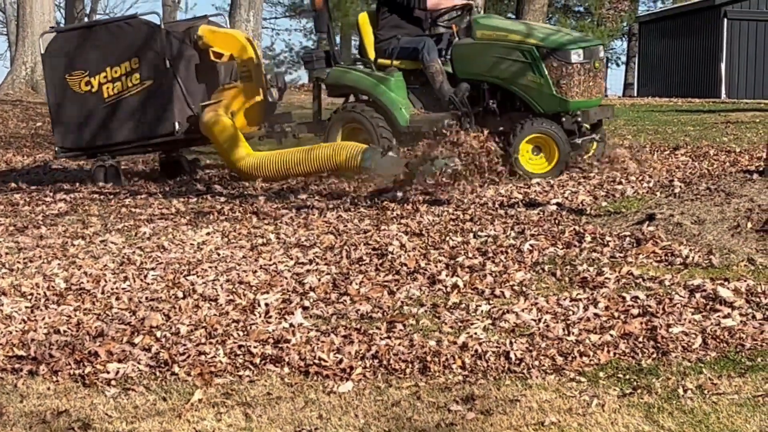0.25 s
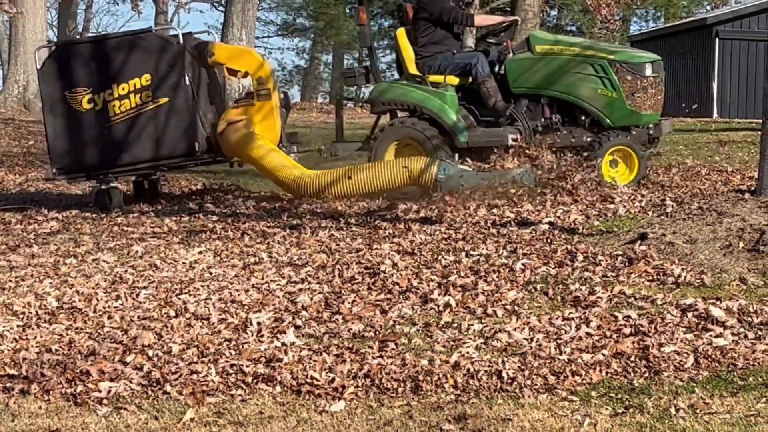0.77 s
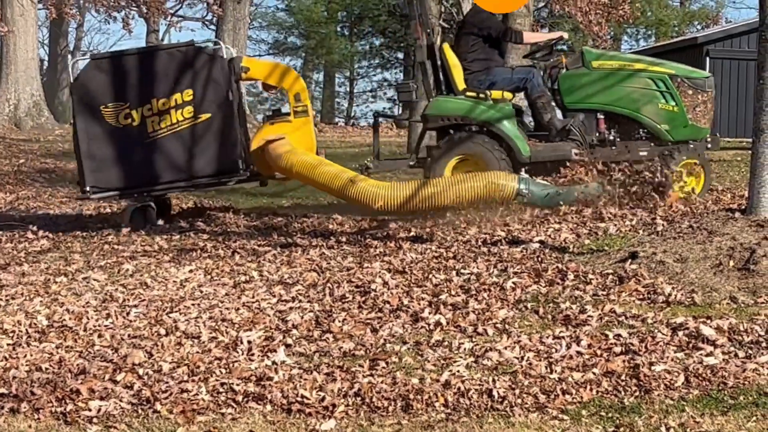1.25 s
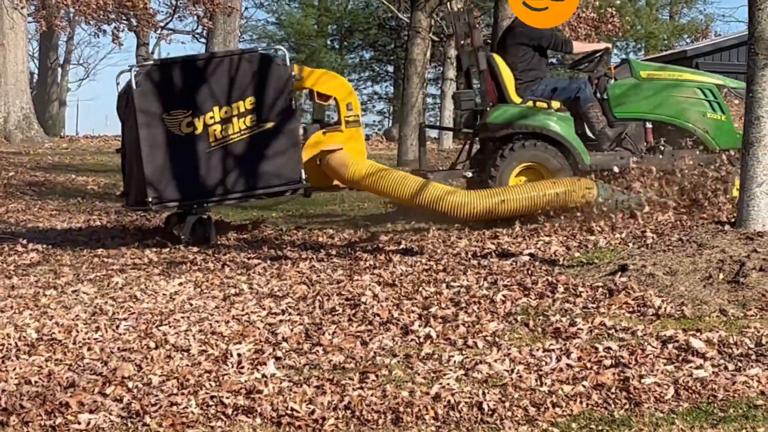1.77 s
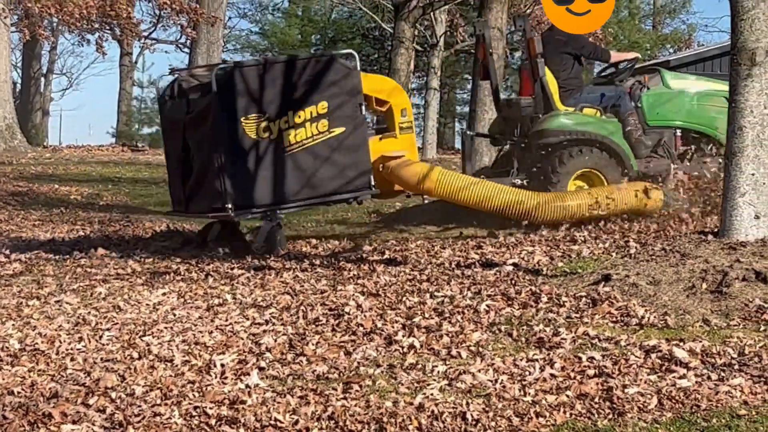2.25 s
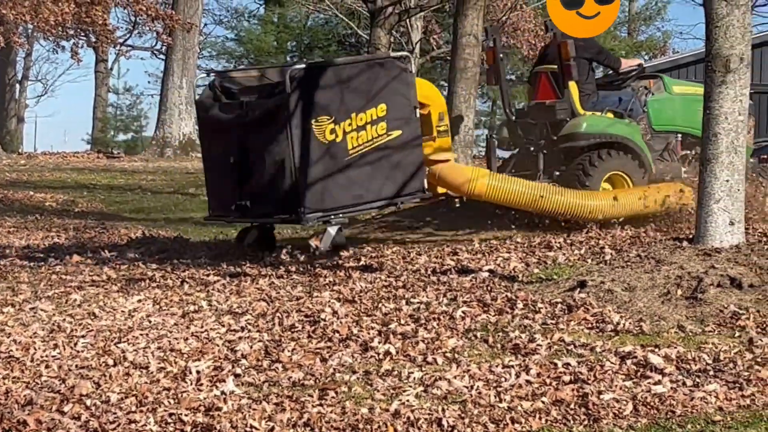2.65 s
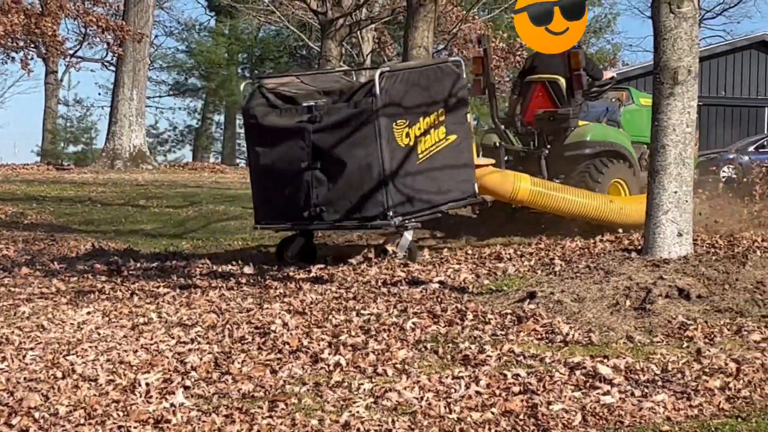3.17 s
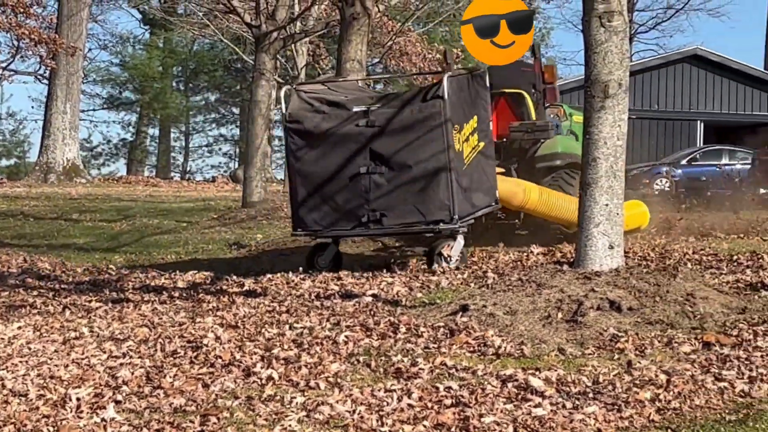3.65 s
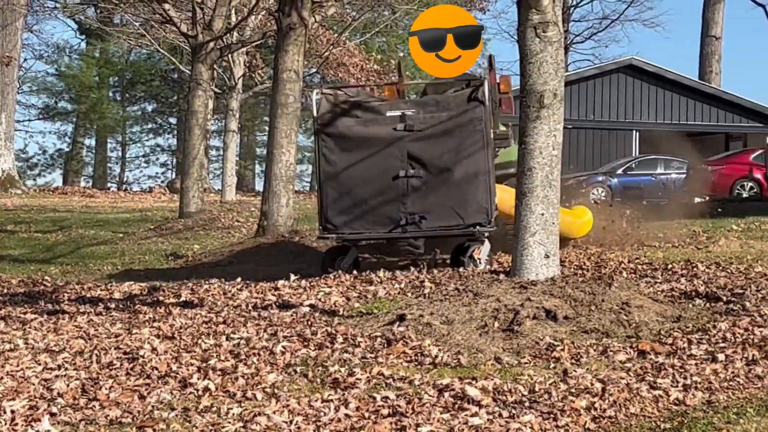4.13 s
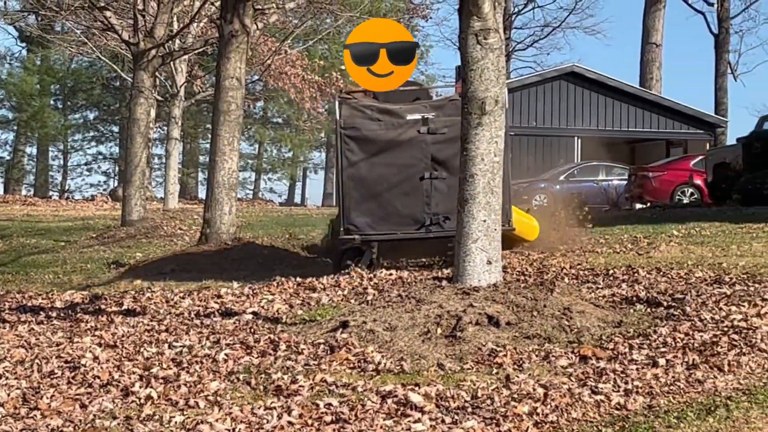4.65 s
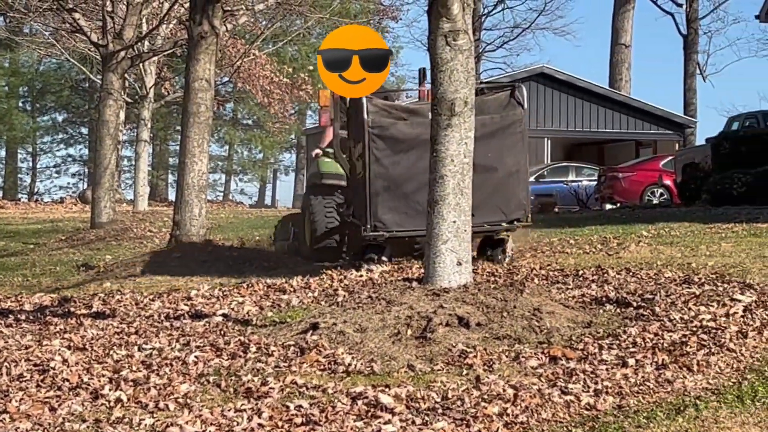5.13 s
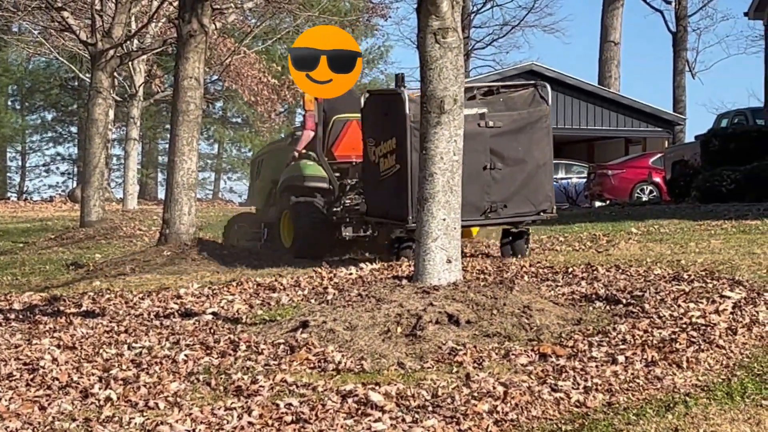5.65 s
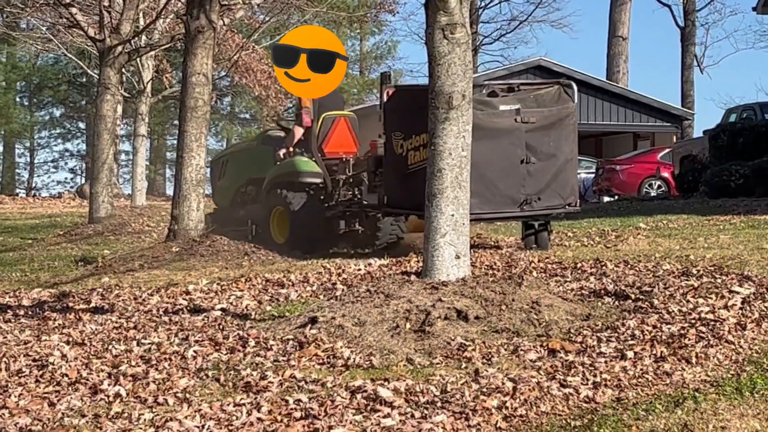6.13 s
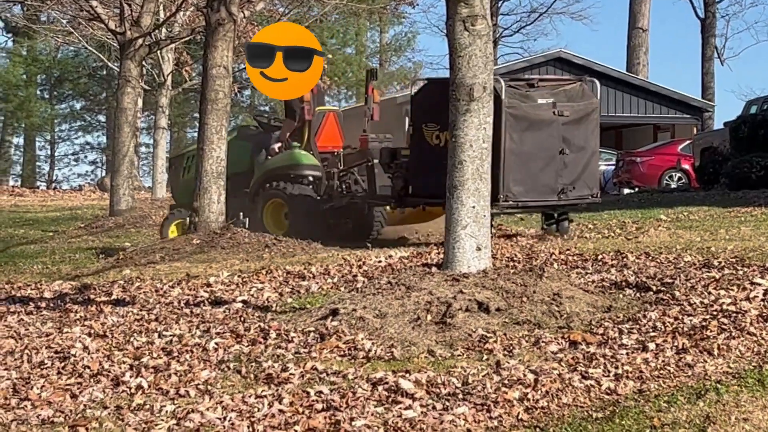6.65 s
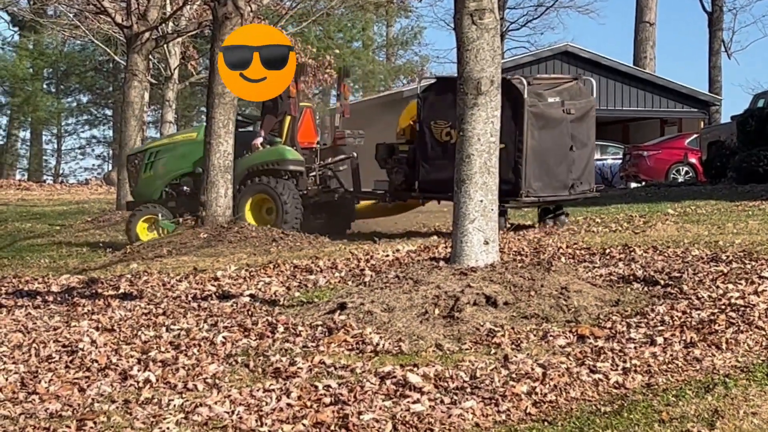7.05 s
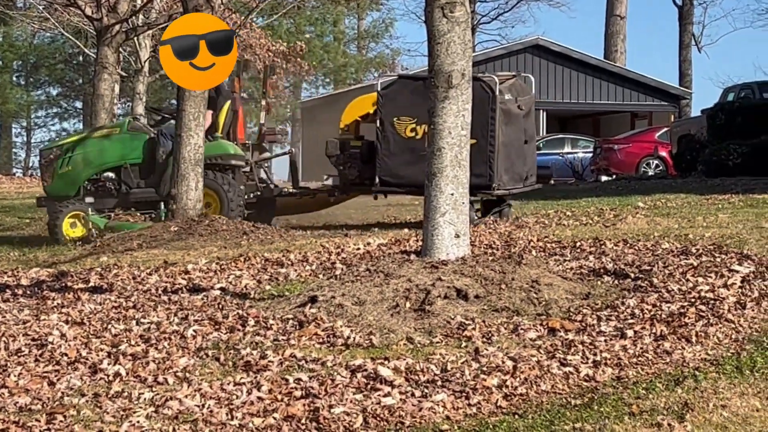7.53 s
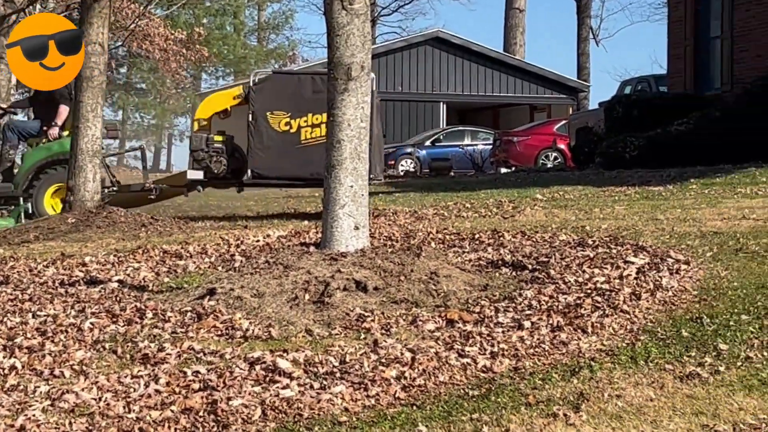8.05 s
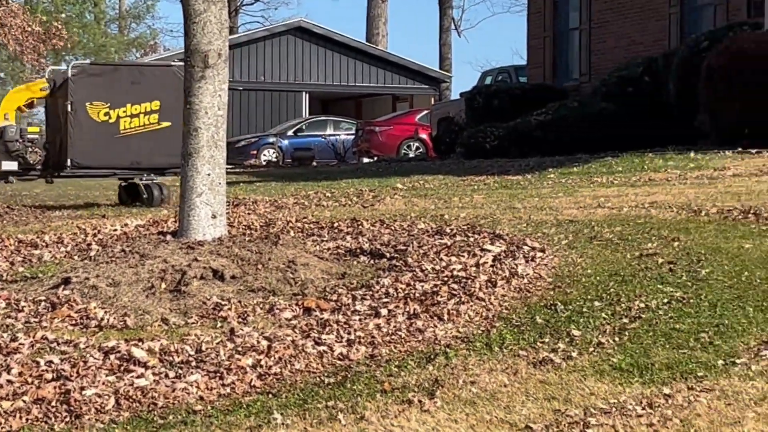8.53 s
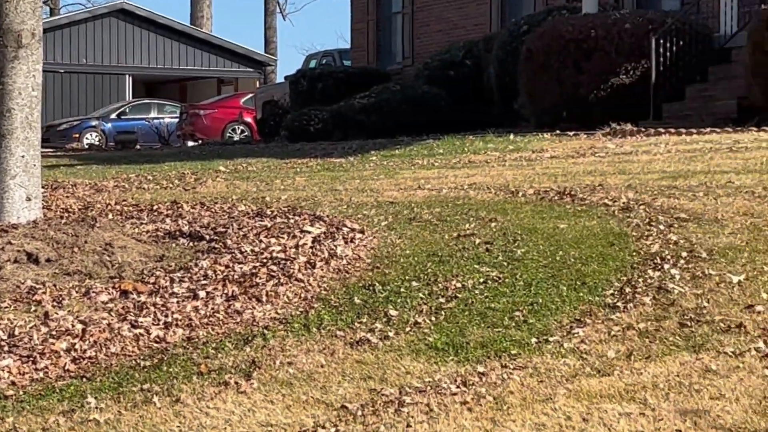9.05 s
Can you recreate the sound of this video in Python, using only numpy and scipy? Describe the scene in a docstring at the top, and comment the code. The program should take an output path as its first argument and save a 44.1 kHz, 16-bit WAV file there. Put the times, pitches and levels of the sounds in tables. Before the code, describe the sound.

A diesel lawn tractor tows a leaf vacuum, engines droning and clattering over a rush of air and crackling dry leaves.

```python
"""Lawn tractor towing a leaf vacuum

A diesel tractor with a mower deck pulls a petrol-engined leaf vacuum round some trees, drawing away
and turning its sides to a stereo microphone. Blades, two exhausts and a pump hum over the clatter of
the diesel. Air rushes under the deck and up the hose, carrying dry leaves, dust and sticks.
Gusts buffet the microphone ports."""
import sys
import numpy as np
from scipy import signal
from scipy.fft import rfft, irfft, next_fast_len
from scipy.io import wavfile
from scipy.ndimage import uniform_filter1d, map_coordinates

SR = 44100
rng = np.random.default_rng(int(sys.argv[2]) if len(sys.argv) > 2 else 0)


def generate_wav(sig):
    """Save sig (samples, or channels by samples) to the path in sys.argv[1] as 16-bit PCM at SR."""
    pcm = np.round(np.clip(np.atleast_2d(sig).T, -1, 1) * 32767).astype(np.int16)
    wavfile.write(sys.argv[1], SR, pcm)


N = 409688

# Blade passing rate, belted to the diesel: t/s, f/Hz
BLADE_RATE = [(0, 106.3), (1.2, 106.4), (2.7, 105.9), (4, 106.1), (5.8, 106.3), (7, 106.6), (8.3, 107.2),
              (9.29, 107.4)]


def blades():
    """Each blade tip thumps the air under the deck; the tones beat slowly and swell by turns."""
    low_levels = [(0, -18.5, -27, -53, -33), (.2, -19.5, -26, -39.5, -34), (.4, -23, -27.5, -40, -39.5),
                  (.8, -37, -34, -36, -42.5), (1.1, -27.5, -35, -31.5, -40.5),
                  (1.5, -24.5, -27.5, -36.5, -37.5), (1.9, -20.5, -23.5, -40, -41),
                  (2.4, -17.5, -27, -42, -44.5), (2.62, -18, -37, -41, -36.5), (2.9, -17, -40, -37.5, -45),
                  (3.15, -18.5, -34.5, -37.5, -46), (3.4, -22, -35.5, -49, -58),
                  (3.65, -21, -25.5, -52, -43), (3.88, -30, -33, -47, -50), (4, -29.5, -25.5, -34, -58),
                  (4.25, -24.5, -27.5, -36.5, -57), (4.6, -21.5, -32, -34, -56),
                  (5.2, -17.5, -30.5, -43, -42), (5.65, -15.5, -33, -39.5, -55),
                  (5.95, -15.5, -37, -50, -50), (6.45, -15, -31.5, -44, -49.5),
                  (6.9, -21.5, -34.5, -44, -40), (7.3, -30, -36.5, -44, -44),
                  (7.8, -33.5, -34.5, -38, -42.5), (8.15, -25, -31.5, -35, -41.5),
                  (8.35, -27, -32.5, -34.5, -39), (8.6, -30, -37.5, -36.5, -46),
                  (8.9, -31, -33.5, -38, -44), (9.29, -27, -36, -47, -42)]  # t/s, level/dB of harmonics 1, 2, 3, 4
    fifth_level = [(0, -53), (.8, -58), (1.3, -47), (1.65, -39), (2, -45), (2.3, -55), (6.8, -56),
                   (7.5, -45), (7.9, -56), (8.25, -47), (8.7, -54), (9.29, -49)]  # harmonic 5: t/s, level/dB
    top_swells = {6: [(.1, .3, -47), (1.7, 0.32, -46.5), (2.6, .2, -52), (4, .3, -54), (4.68, .12, -46),
                  (5.1, .08, -44), (6.2, .2, -54), (8.3, .5, -52)], 7: [(4.55, 0.13, -49)],
                  8: [(1.6, .5, -47), (4.9, 0.51, -47), (6.15, 0.093, -50)], 9: [(1.2, .6, -48),
                  (5.1, .2, -47), (7.4, 0.087, -47)], 10: [(.8, .6, -54), (5.8, .15, -47), (6.4, .25, -51),
                  (7.1, .15, -46.5)]}  # by harmonic number: t/s, spread/s, level/dB
    phase = turns(curves(BLADE_RATE)[0])
    low = sum(tone(k * phase, db, 0.75, 0.12) for k, db in enumerate(curves(low_levels), 1))
    low += tone(5 * phase, curves(fifth_level)[0], 1.1, .2)
    top = sum(tone(k * phase, swells(rows, rest_db=-59.5), 1.6, .3) for k, rows in top_swells.items())
    return low + top


def diesel():
    """Exhaust of three slightly unequal cylinders; returns the sound and the firing phase."""
    firing_level = [(0, -21.5), (1.5, -21), (2.1, -23.5), (2.7, -30), (3.4, -26), (4.1, -26.5),
                    (4.7, -23.5), (5.9, -28), (6.4, -25.5), (7.5, -34), (8.1, -30), (9.29, -27.5)]  # firing tone: t/s, level/dB
    orders = [(2, -12), (5, -9.5), (7, -8), (9, -16.5), (12, -17), (13, -17), (14, -11), (15, -12.5)]  # multiple of the three-firing cycle, level/dB re second harmonic
    passes_per_firing = 1.351
    second_db = -35.5 + 2.7 * wobble(2.478)
    phase = turns(curves(BLADE_RATE)[0] / passes_per_firing)
    exhaust = tone(phase, curves(firing_level)[0], 0.41, 0.052) + tone(2 * phase, second_db, 1.6, 0.23)
    exhaust += sum(tone(k * phase / 3, second_db + db, 2.5, .3) for k, db in orders)
    return exhaust, phase


def clatter(phase):
    """Firings knock six resonances, loudest as the engine side faces the microphone."""
    # Modes of each part: f/Hz, width/Hz, level/dB
    cover = [(2834, 47, 5), (2420, 58, -8.5)]
    block = [(3390, 100, 3), (3670, 92, 1), (4250, 85, -11)]
    rattle = [(6990, 150, 16), (6430, 150, -18)]
    hood = [(1950, 51, -2), (2090, 47, -2)]
    tappet = [(3750, 100, 3), (3840, 85, -4)]
    drone = [(1760, 31, 13), (1700, 30, 3), (1420, 46, -12)]
    parts = cover, block, rattle, hood, tappet, drone
    part_swells = ([(.4, 0.36, -39), (2.6, .1, -45), (5.95, 0.03, -40), (6.65, .15, -49),
                   (7.15, 0.32, -41.5), (8.1, .5, -48)], [(.4, .4, -45), (2.6, .1, -51), (7.66, .12, -40),
                   (7.92, .12, -44), (8.18, 0.13, -35), (8.45, 0.13, -37), (8.7, 0.054, -36),
                   (9.05, 0.054, -37), (9.22, .05, -39)], [(3.76, 0.075, -41), (6.2, 0.32, -42),
                   (7.6, .2, -48), (8.05, 0.16, -42), (9.05, 0.18, -55)], [(.45, .2, -40), (2.5, .2, -55),
                   (8.5, 0.12, -37), (8.75, 0.13, -39.5), (8.95, .1, -37), (9.13, .05, -37),
                   (9.25, .1, -36)], [(6.1, .35, -47), (7.68, 0.07, -42), (7.9, .15, -39.5),
                   (8.6, .08, -39), (8.85, 0.13, -38), (9.07, .1, -42), (9.25, 0.064, -39)],
                   [(.15, 0.29, -48), (2.7, 0.33, -39), (6, .6, -53), (8.66, .1, -37), (8.85, .12, -42),
                   (9.03, .08, -42), (9.2, 0.092, -36)])  # per part: t/s, spread/s, relative level/dB
    rest_levels = (-50, -56, -52.5, -54, -60, -48.5)  # per part, between swells: relative level/dB
    unevenness = (.19, 0.15, 0.34, .19, 0.53, 0.6)  # per part: how much harder one cylinder knocks
    fired = np.diff(np.floor(phase / (2 * np.pi) + .008 * wobble(40)), prepend=0) > 0
    out = 0
    for modes, rows, rest_db, uneven in zip(parts, part_swells, rest_levels, unevenness):
        gate = np.exp(0.76 * np.cos(phase) + uneven * np.cos(phase / 3)) * amp(2.1 * wobble(30))
        blows = unit(fired * gate * amp(1.5 * rng.standard_normal(N)))
        bursts = unit(gate * rng.standard_normal((2, N)))
        knocks = bursts + 1.6 * np.array([blows, np.roll(blows, 150)])  # direct, scattered
        level_db = swells(rows, rest_db) - 4.5 + 0.66 * wobble(6.5)
        out += amp(level_db) * resonate(knocks, modes)
    return out


def resonate(knocks, modes, soft_hz=7500):
    """Knocks ring a part's modes, softened above soft_hz; rms 1."""
    def response(hz):
        ring = sum(amp(db) * 1j * hz * width / (centre ** 2 - hz ** 2 + 1j * hz * width)
                   for centre, width, db in modes)
        return ring / (1 + 1j * hz / soft_hz) ** 4
    return unit(filtered(knocks, response))


def pump(phase):
    """The pump whines in step with the diesel, swelling as its side faces the microphone."""
    orders = (10.54, 19.17, 28.05, 13.33, 18.03, 23.33, 22.0)  # multiples of the firing rate
    tone_swells = ([(4.75, .25, -47), (5.5, 0.39, -37), (7.3, 0.2, -41)], [(.9, .3, -43), (2.2, 0.33, -39),
                   (7.15, 0.59, -40)], [(1.2, .1, -43), (1.6, 0.2, -36), (1.9, 0.089, -43),
                   (2.12, .06, -37), (2.3, 0.093, -36), (8.4, .5, -48)], [(.3, .3, -49), (1.9, 0.68, -40)],
                   [(.8, 0.62, -42), (2.2, .2, -39)], [(1.4, 0.37, -48), (2.4, .15, -47)],
                   [(.06, 0.032, -32), (.27, .035, -35)])  # per tone: t/s, spread/s, relative level/dB
    return sum(tone(k * phase + .3 * wobble(35), swells(rows, -53) - 4.5, 1.6, 0.66)
               for k, rows in zip(orders, tone_swells))


def petrol(firing_hz=29.07):
    """The vacuum's one cylinder fires once in two turns; returns its tones and a pulsing gain."""
    shaft_level = [(0, -32), (1.5, -33), (3.3, -36), (5.8, -36.5), (6.4, -38.5), (7.9, -36.5), (8.8, -32),
                   (9.29, -31)]  # shaft tone: t/s, level/dB
    orders = [(3, -9), (4, 1.5), (5, 0.5), (6, -5.5), (7, -0.5), (8, -8.5), (9, -34), (10, -9.5),
              (12, -13.5), (13, -10.5), (14, -12.5)]  # exhaust tones: multiple of the firing rate, relative level/dB
    shaft_db, = curves(shaft_level)
    exhaust_db = shaft_db - 3.5
    phase = turns(np.full(N, firing_hz))
    shaft = tone(2 * phase, shaft_db, 1.0, 0.18)
    exhaust = sum(tone(k * phase, exhaust_db + db, 1.7, 0.3) for k, db in orders)
    return shaft + exhaust, 1 + 0.087 * np.cos(phase)


def air(puffs):
    """Air roars under the deck and up the hose; leaves and dust crackle in it in clumps."""
    # The trailer shades the rush as the rig turns away: t/s, relative level/dB of hose, leaves, dust
    rush_levels = [(0, -32.5, -40, -47), (1.2, -34.5, -42.5, -48.5), (2.2, -34.5, -42.5, -49),
                   (3.3, -37, -44.5, -49.5), (3.6, -39, -43, -48.5), (3.78, -40.5, -44, -46.5),
                   (3.9, -43, -46, -53), (4.05, -43.5, -48, -57), (4.65, -44, -50, -52.5),
                   (4.9, -40.5, -45, -49), (5.5, -38.5, -44.5, -48), (6.3, -40.5, -43.5, -52),
                   (7.3, -37.5, -42, -52.5), (8.5, -37, -41.5, -51), (8.75, -39, -39.5, -50.5),
                   (9.29, -40.5, -40.5, -50.5)]
    # Noise spectra: f/Hz, relative level/dB
    deck_spectrum = [(30, -25), (60, 10.5), (200, 7.5), (350, 6), (480, 1.5), (650, -0.5), (900, 0),
                     (1300, -9.5), (2200, -29), (5000, -120)]
    hose_spectrum = [(200, -120), (500, -35), (900, -1), (1300, 0), (1500, 2.5), (1650, -1.5), (1800, 0.5),
                     (2500, -4.5), (3500, -10), (5500, -20), (10000, -120)]
    leaf_spectrum = [(1500, -20), (2800, 0), (4000, -0.5), (5000, -1.5), (6000, -4), (7200, -4),
                     (8500, -16), (11000, -24), (16000, -60)]
    dust_spectrum = [(3000, -40), (5000, -8), (7500, -1), (9500, 4), (11000, -3), (12500, -2),
                     (14000, -2.5), (14700, -3), (15500, -20)]
    roar_lift, dust_lift = gulps()
    distance_db = -0.64 * np.minimum(np.arange(N) / SR, 5.9)  # the deck fades as the rig draws away
    hose_db, leaves_db, dust_db = curves(rush_levels) + np.array([roar_lift, .95 * dust_lift, dust_lift])
    clumps = .4 * wobble(9) + 1.3 * wobble(25) + 1.1 * wobble(50)
    deck = amp(-29 + distance_db + roar_lift) * coloured(patchy(0.59), deck_spectrum)
    hose = amp(hose_db + 1.5 + 0.23 * clumps) * puffs * coloured(patchy(0.76), hose_spectrum)
    rustle = coloured(patchy(1.4) + 0.43 * crackle(2.6), leaf_spectrum)
    leaves = amp(leaves_db + 3.5 + 0.16 * clumps) * puffs * rustle
    hiss = coloured(patchy(.7) + 0.47 * crackle(3.5), dust_spectrum)
    dust = amp(dust_db + 2.5 + 0.83 * clumps) * hiss
    return deck + hose + leaves + dust


def gulps():
    """Clumps of leaves go up the hose and lift roar and dust, in dB: quick rise, slower fall."""
    clumps = [(1.49, 2, 3.5, 0.038, .05), (2.595, 4, 5.5, .005, 0.059), (2.668, 1.5, 3, .005, .04),
              (2.74, 0.5, 1.5, .023, 0.06), (3.43, -0.5, 1.2, .023, 0.027), (3.7, -0.5, 0.5, .023, .05),
              (4.8, 0, 1, .023, 0.056), (5.42, 0.5, 2, 0.029, 0.082), (8.33, 0, 3, 0.028, 0.055),
              (9.25, 2.5, 3, 0.033, 0.051)]  # t/s, roar lift/dB, dust lift/dB, rise/s, fall/s
    t, lift = np.arange(N) / SR, np.zeros((2, N))
    for s, roar_db, dust_db, rise_s, fall_s in clumps:
        spread = np.where(t < s, rise_s, fall_s)
        lift += np.outer([roar_db, dust_db], np.exp(-((t - s) / spread) ** 2))
    return lift


def crackle(spread_db, per_s=1500):
    """Clicks of dry leaves; a few are much larger than the rest."""
    size = amp(spread_db * np.minimum(rng.exponential(size=(2, N)), 4.5)) * rng.standard_normal((2, N))
    return unit(size * (rng.random(N) < per_s / SR))


def twigs():
    """Twigs snap: a bright crack with a short tail."""
    snaps = [(1.0515, -31), (2.591, -25), (2.668, -30), (3.1877, -22), (3.256, -29), (3.3717, -30),
             (3.7236, -23), (3.7321, -15), (3.974, -32), (5.5473, -27), (6.8164, -31), (7.7882, -33),
             (7.955, -28), (8.1778, -30), (8.9553, -29)]  # t/s, relative level/dB
    out, t = np.zeros(N + 512), np.arange(512) / SR
    for s, db in snaps:
        envelope = amp(db - 60 * t / .0015) + amp(db - 4 - 60 * t / .011)
        out[round(s * SR):][:512] += envelope * rng.choice([-1, 1], size=512)
    return filtered(out[:N], lambda hz: hz ** 2 / (hz ** 2 + 3000 ** 2) / (1 + (hz / 11000) ** 2))


def sticks():
    """Sticks knock along the hose."""
    knocks = [(2.593, 1841, -29), (2.604, 1195, -25), (2.613, 1485, -23), (2.618, 947, -25),
              (2.63, 1324, -22), (2.638, 1894, -29), (2.653, 904, -26), (2.681, 1668, -22),
              (2.698, 1000, -28)]  # t/s, f/Hz, relative level/dB
    return rings(knocks, t60_s=.015, attack_s=.0004)


def loose_metal():
    """Loose metal pings under the diesel's hardest knocks."""
    pings = [(5.714, 3768, -38), (5.79, 3746, -35), (5.868, 3736, -39), (5.958, 3736, -36),
             (5.981, 3746, -40), (6.02, 3725, -39), (6.108, 3736, -32), (6.147, 3736, -38),
             (6.172, 3736, -40), (6.248, 3779, -37), (6.286, 3714, -39), (6.3, 3714, -37),
             (6.323, 3822, -38), (6.413, 3736, -37), (7.612, 3746, -37), (7.612, 3391, -31),
             (7.751, 3413, -35), (7.838, 3843, -35), (7.851, 3811, -35), (7.902, 3843, -32),
             (7.964, 3757, -32), (8.051, 3811, -30), (8.142, 3348, -32), (8.204, 3391, -34),
             (8.216, 3380, -34), (8.404, 3369, -33), (8.554, 3811, -33), (8.628, 3789, -32),
             (8.665, 3714, -31), (8.668, 3391, -33), (8.677, 2723, -29), (8.693, 3400, -33),
             (8.706, 3369, -30), (8.818, 3703, -32), (8.879, 3477, -31), (8.879, 3768, -33),
             (8.916, 3423, -31), (9.045, 3380, -33), (9.206, 3789, -32), (9.215, 3509, -33),
             (9.233, 3780, -33), (9.281, 3714, -33), (3.765, 6696, -40), (3.785, 6280, -41),
             (3.837, 6599, -38), (3.9, 6350, -38), (3.93, 5950, -40), (3.975, 7050, -39),
             (7.793, 3830, -36), (8.081, 3563, -35), (8.178, 3509, -37), (8.329, 3445, -35),
             (8.792, 3822, -35), (9.017, 3692, -35), (6.376, 6901, -32), (6.413, 6912, -34),
             (7.788, 7040, -35), (7.967, 6793, -33), (8.178, 6944, -37), (8.316, 6987, -37),
             (8.957, 7041, -31), (9.032, 6998, -34)]  # t/s, f/Hz, relative level/dB
    return rings(pings, t60_s=0.052, attack_s=0.0022)


def squeaks(phase):
    """Short raspy squeaks that flutter with the firings."""
    chirps = [(5.86, .015, 2450, 0, -45), (5.975, 0.027, 2370, 3000, -42), (6.1, 0.015, 2400, 0, -41),
              (6.125, .015, 2450, 0, -41), (6.16, .035, 2450, 0, -44)]  # t/s, spread/s, f/Hz, rise/(Hz/s), relative level/dB
    t, out = np.arange(N) / SR, np.zeros(N)
    rasp = 1.2 * wobble(90)  # radians
    for s, spread, hz, rise, db in chirps:
        near = slice(round((s - 3 * spread) * SR), round((s + 3 * spread) * SR))
        u = t[near] - s
        envelope = amp(db + 2.0) * np.exp(-(u / spread) ** 2)
        out[near] += envelope * np.sin(2 * np.pi * u * (hz + rise * u / 2) + rasp[near])
    return out * (1 + .8 * np.cos(phase)) * amp(2.0 * wobble(60))


def wind():
    """Lumpy buffeting right at the microphone, mostly common to both ports."""
    gusts = [(2.1, 0.37, -38), (3.2, .5, -38), (4.9, 1.1, -34), (7, 1.1, -43), (8.9, 0.56, -31.5),
             (2.62, 0.045, -27), (3.6, 0.28, -41), (3.88, .05, -38), (4.62, 0.14, -28.5), (5.35, 0.13, -44),
             (5.8, 0.17, -27), (6.25, .06, -35), (6.47, 0.049, -29.5), (6.75, 0.024, -26),
             (6.99, 0.029, -30), (7.19, .04, -29.5), (7.52, 0.042, -33), (8.55, 0.067, -31),
             (8.9, 0.069, -27), (9.13, 0.071, -26.5)]  # t/s, spread/s, relative level/dB
    spectrum = [(15, -40), (30, -11), (50, 4.5), (80, 3.5), (130, 0.5), (200, -2.5), (350, -34),
                (1000, -120)]  # f/Hz, relative level/dB
    lumps = amp(2.2 * wobble(12)) * rng.standard_normal((2, N))
    common, side = amp(swells(gusts, -42.5) + 3.5) * coloured(lumps, spectrum)
    return common + thumps() + amp(-11) * np.array([side, -side])


def thumps(centre_hz=94, spread_s=0.01):
    """Single pushes of wind on the ports, each about one low cycle at a new pitch."""
    pushes = [(2.62, -17), (3.88, -16), (4.551, -13), (4.7, -15), (5.78, -11), (6.47, -14), (6.75, -11),
              (6.99, -16), (7.19, -18), (7.96, -15), (8.04, -17), (8.548, -11.5), (8.605, -17),
              (8.658, -18), (8.78, -15), (8.881, -13.5), (8.922, -12.5), (9.068, -15), (9.13, -15),
              (9.2, -14), (9.283, -15)]  # t/s, level/dB
    out, u = np.zeros(N), np.arange(-2048, 2048) / SR
    for (s, db), (bend, turn) in zip(pushes, rng.random((len(pushes), 2))):
        hz = centre_hz * (0.76 + bend / 2)
        push = amp(db) * np.exp(-(u / spread_s) ** 2) * np.cos(2 * np.pi * (hz * u + turn))
        near = out[round(s * SR) - 2048:][:4096]
        near += push[:len(near)]
    return out


def ports(direct, scattered):
    """Direct sound mostly reaches the right port first; scattered sound differs between ports."""
    likeness = [(60, 1), (150, 1), (500, 0.87), (900, 0.92), (1200, 0.77), (1550, 0.3), (1900, 1),
                (2300, 0.99), (3500, 1), (4500, 1), (6000, 0.88), (8500, 1), (10000, 0.8), (12000, 1),
                (14000, .88), (15500, .97)]  # f/Hz, left-right coherence
    right_lead = [(0, 0), (200, .18), (1300, 0.32), (1700, -0.9), (3100, 0.72), (3900, 0), (5000, 0),
                  (5700, 1), (6600, 1), (7500, 2), (8300, 2.5), (8900, 3.5), (11100, 6), (12900, 6.5),
                  (14700, 9.5), (15600, 8.5)]  # f/Hz, phase/rad
    left_excess = [(100, -0.6), (250, -0.5), (400, 1), (550, -2.5), (850, 1.5), (1200, -0.5), (1800, -2.5),
                   (2800, 0), (4000, -.1)]  # f/Hz, left minus right level/dB

    def response(hz):
        turn = np.arccos(np.clip(along(likeness, hz), 0, 1)) / 2
        shift = np.exp(.5j * np.interp(hz, *np.transpose(right_lead))) * amp(-along(left_excess, hz) / 2)
        return np.array([[np.cos(turn), np.sin(turn)] / shift, [np.cos(turn), -np.sin(turn)] * shift])
    return filtered(np.array([direct, scattered]), response).sum(axis=1)


def rings(rows, t60_s, attack_s):
    """Each strike rings one mode that dies quickly, its phase slightly rough."""
    out, t = np.zeros(N + 2048), np.arange(2048) / SR
    for (s, hz, db), rough in zip(rows, rng.standard_normal((len(rows), 2048))):
        envelope = amp(db + 3.0 - 60 * t / t60_s) * (1 - np.exp(-t / attack_s))
        out[round(s * SR):][:2048] += envelope * np.sin(2 * np.pi * hz * t + .02 * np.cumsum(rough))
    return out[:N]


def tone(phase, db, waver_db, drift_rad):
    """A sine whose level wanders about db (rms) and whose phase drifts."""
    strength = np.sqrt(2) * amp(db + waver_db * wobble(7))
    return strength * np.sin(phase + drift_rad * wobble(5) + 2 * np.pi * rng.random())


def patchy(depth_db):
    """Direct and scattered white noise with patches of random gain in time and frequency."""
    spectra = signal.stft(rng.standard_normal((2, N)), nperseg=512)[2]
    patches = uniform_filter1d(rng.standard_normal(spectra.shape[1:]), size=8, axis=0)
    patches = uniform_filter1d(patches, size=10, axis=1)
    return signal.istft(spectra * amp(depth_db * unit(patches)), nperseg=512)[1][:, :N]


def swells(rows, rest_db):
    """Level in dB: bell-shaped swells over a resting level."""
    t = np.arange(0, N, 64) / SR
    bells = sum(amp(2 * db) * np.exp(-((t - s) / spread) ** 2) for s, spread, db in rows)
    return np.interp(np.arange(N) / SR, t, 10 * np.log10(amp(2 * rest_db) + bells))


def wobble(rate):
    """A smooth random curve, rate knots a second."""
    at = np.arange(0, N + 64, 64)
    knots = rng.standard_normal(int(N * rate / SR) + 4)
    return np.interp(np.arange(N), at, map_coordinates(knots, [at * rate / SR]))


def turns(hz):
    """Running phase from a random start."""
    return 2 * np.pi * (np.cumsum(hz) / SR + rng.random())


def curves(rows):
    """One value per sample for each column after the time."""
    times, *columns = np.transpose(rows)
    return [np.interp(np.arange(N) / SR, times, column) for column in columns]


def coloured(x, spectrum):
    """x through a spectrum, rms 1."""
    return unit(filtered(x, lambda hz: amp(along(spectrum, hz))))


def filtered(x, response):
    """x through a complex frequency response."""
    size = next_fast_len(N + 8192)
    return irfft(rfft(x, size) * response(np.fft.rfftfreq(size, 1 / SR)), size)[..., :N]


def along(points, hz):
    """Interpolate (f/Hz, value) points on a log axis."""
    freqs, values = np.transpose(points)
    return np.interp(np.log(hz + 1), np.log(freqs + 1), values)


def amp(db):
    return 10 ** (np.asarray(db) / 20)


def unit(x):
    return x / np.sqrt(np.mean(x ** 2) + 1e-20)


def scene():
    """The rig reaches the microphone directly and scattered; the wind strikes the ports themselves."""
    exhaust, firing_phase = diesel()
    whine = pump(firing_phase)
    knocks = clatter(firing_phase)
    tractor = exhaust + whine + squeaks(firing_phase) + loose_metal()
    putter, puffs = petrol()
    tones = tractor + putter + blades()
    direct, scattered = knocks + air(puffs)
    direct += tones + twigs() + sticks()
    scattered += 0.38 * np.roll(tones, 150)  # 3.4 ms late
    return ports(direct, scattered) + wind()


def record(dry):
    """The recorder keeps nothing above its band limit."""
    return filtered(dry, lambda hz: hz < 15720)


dry = scene()
out = record(dry)
generate_wav(out)
```